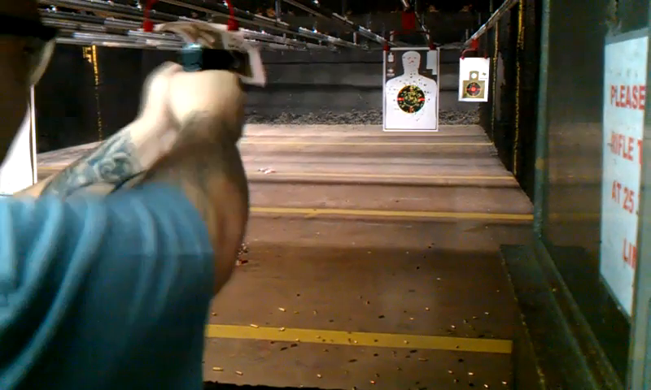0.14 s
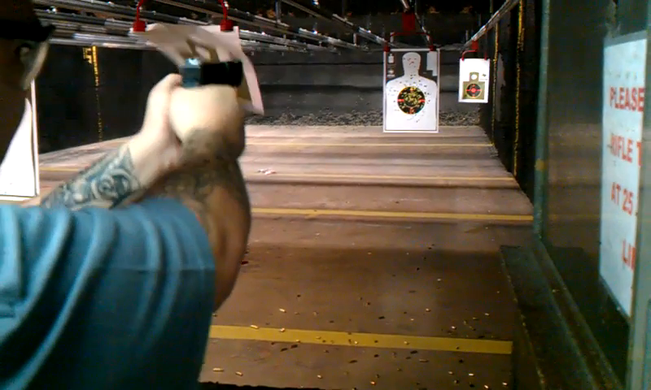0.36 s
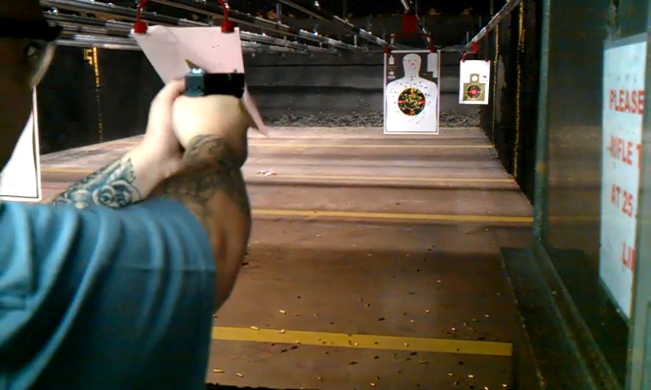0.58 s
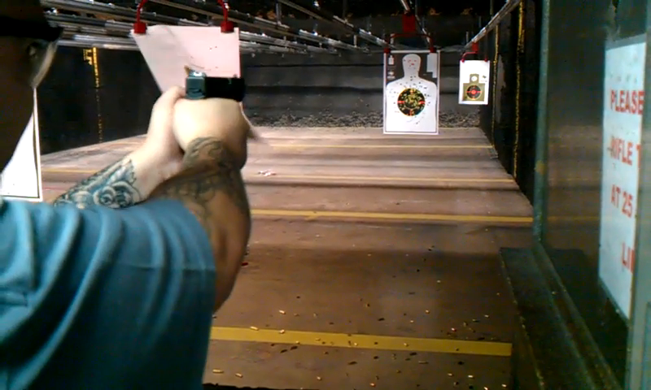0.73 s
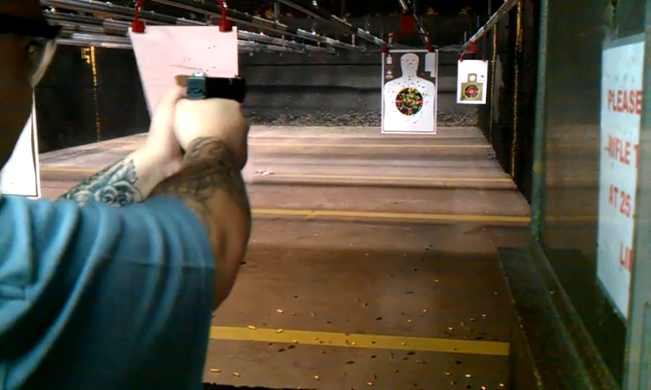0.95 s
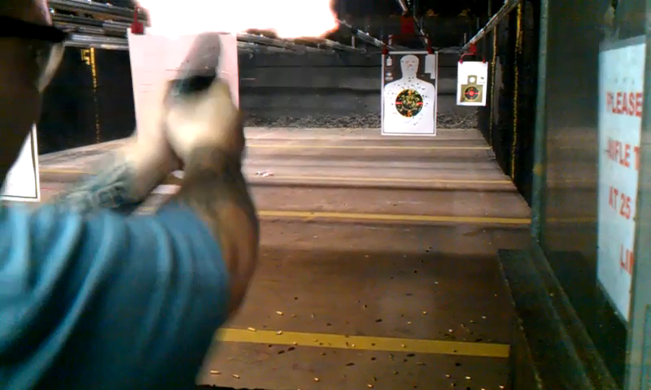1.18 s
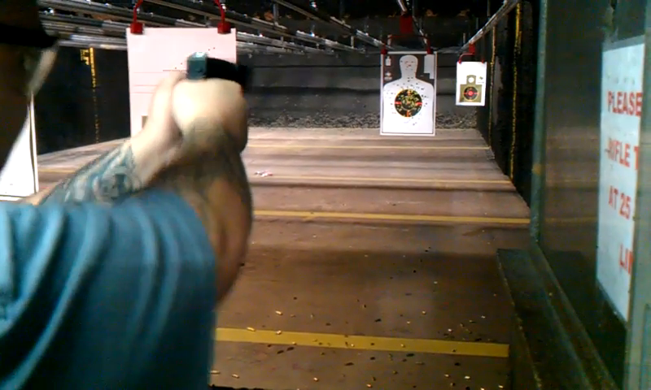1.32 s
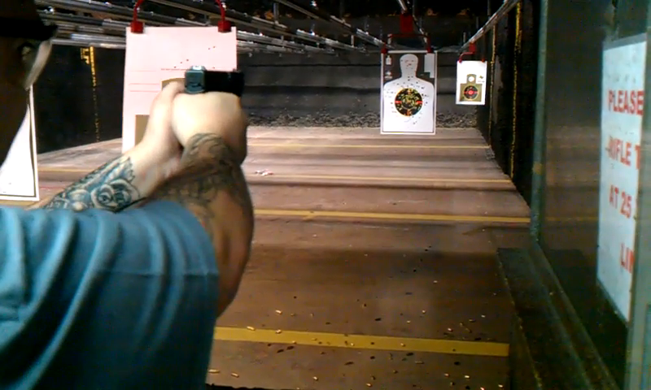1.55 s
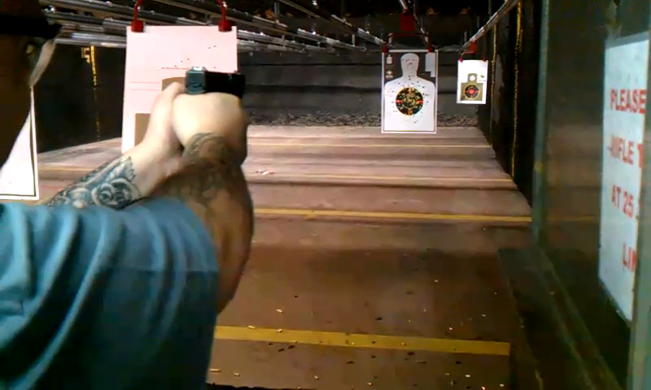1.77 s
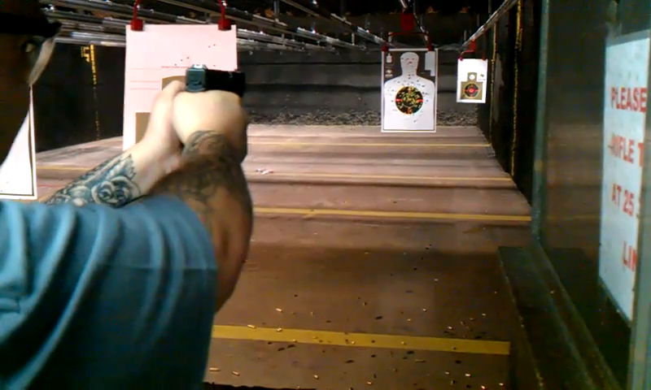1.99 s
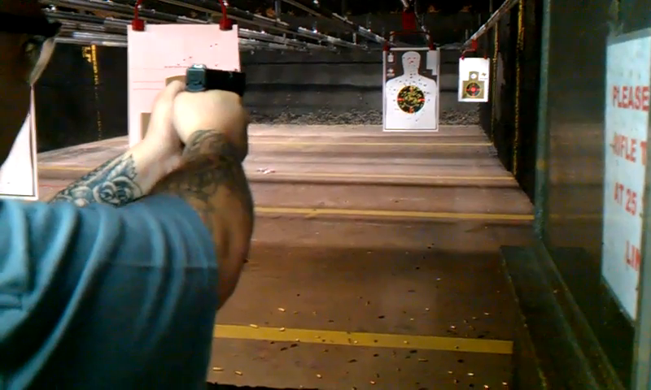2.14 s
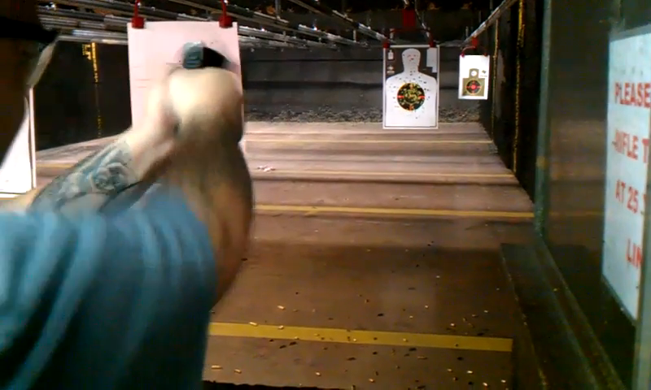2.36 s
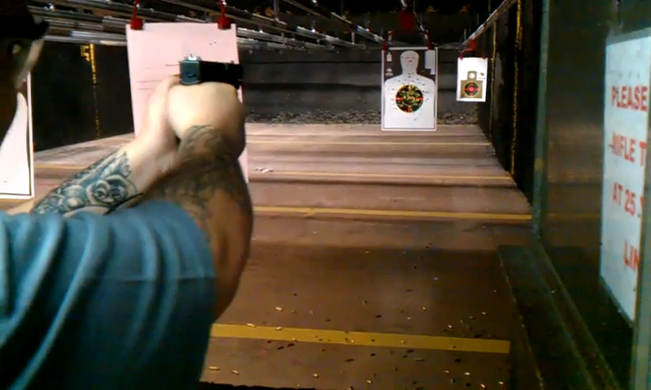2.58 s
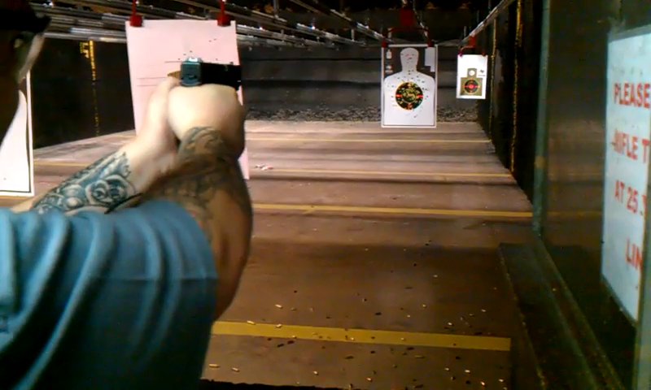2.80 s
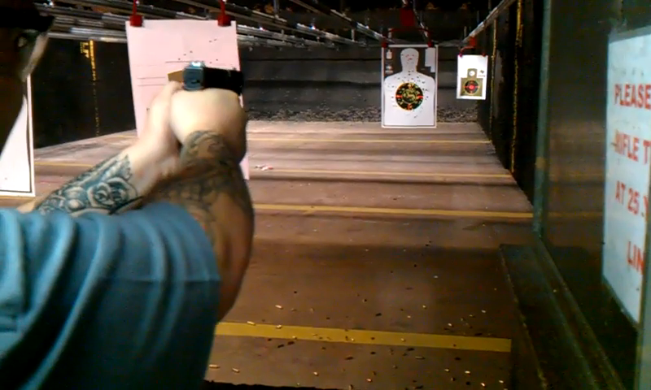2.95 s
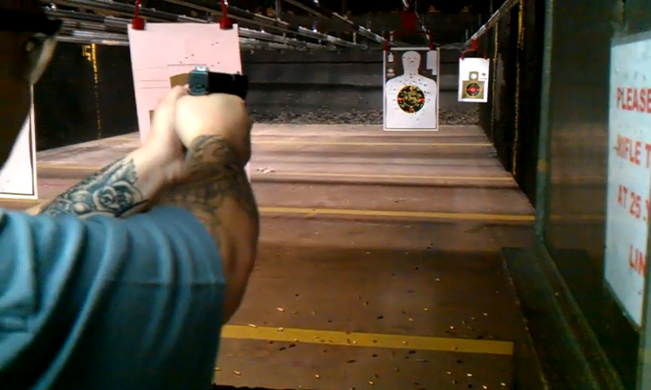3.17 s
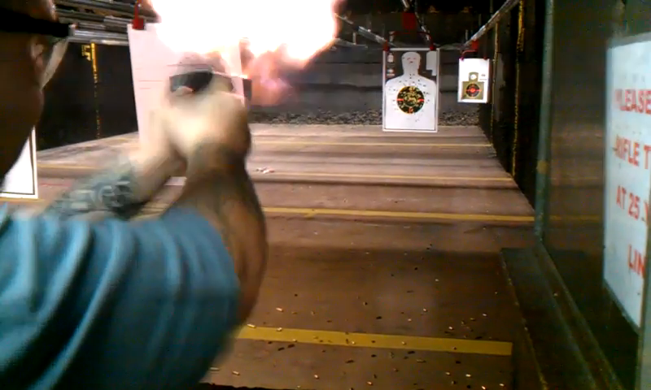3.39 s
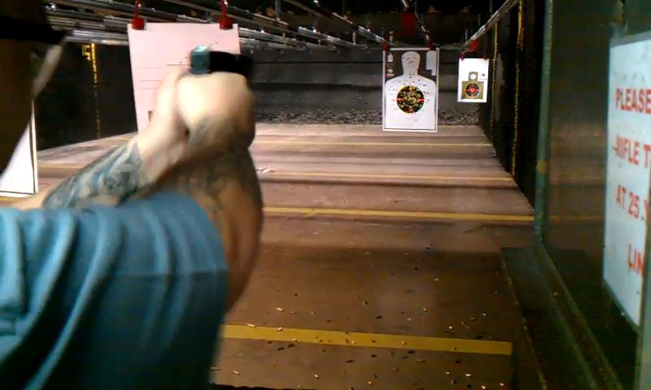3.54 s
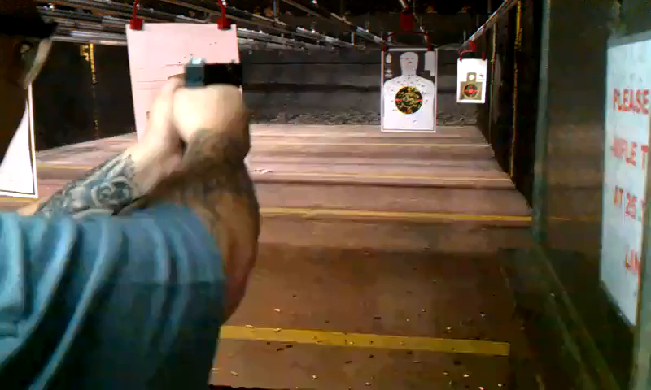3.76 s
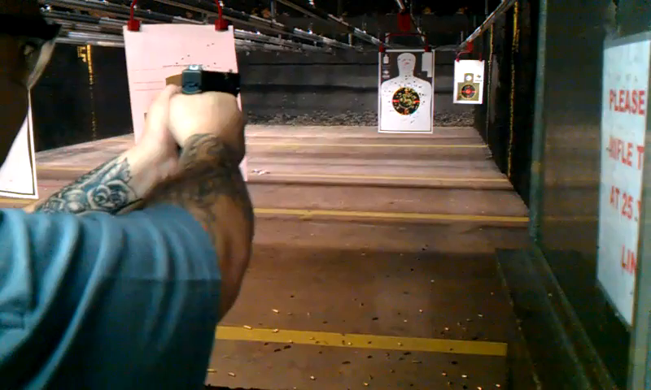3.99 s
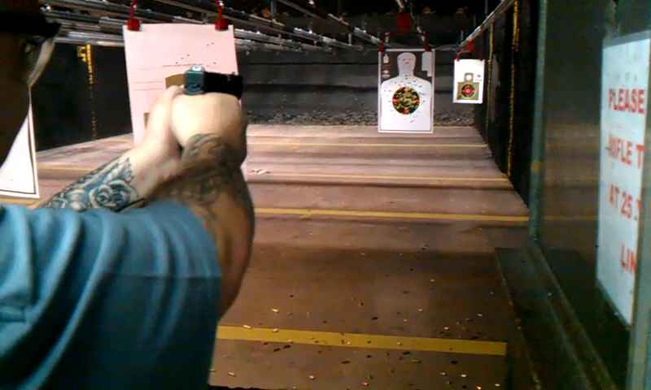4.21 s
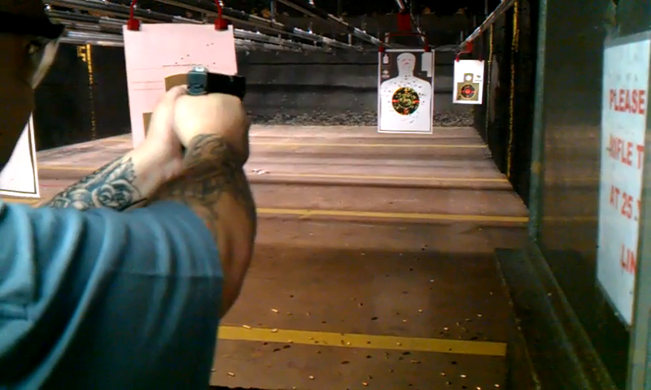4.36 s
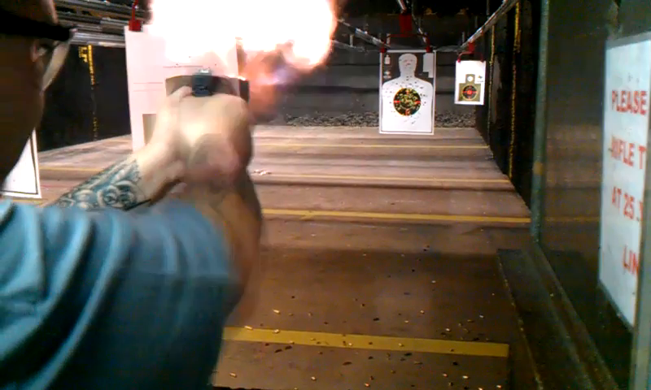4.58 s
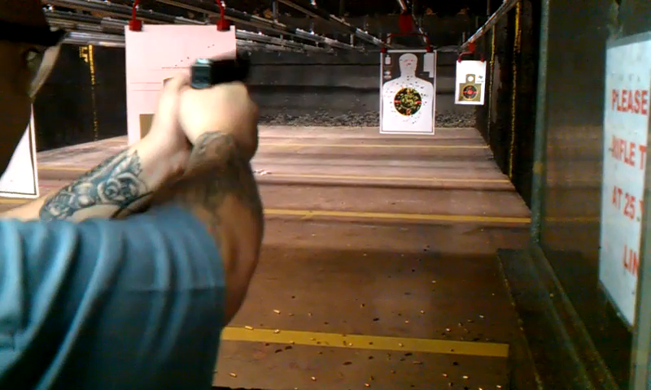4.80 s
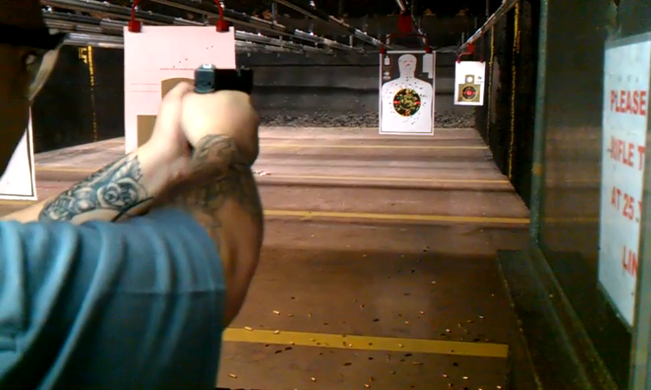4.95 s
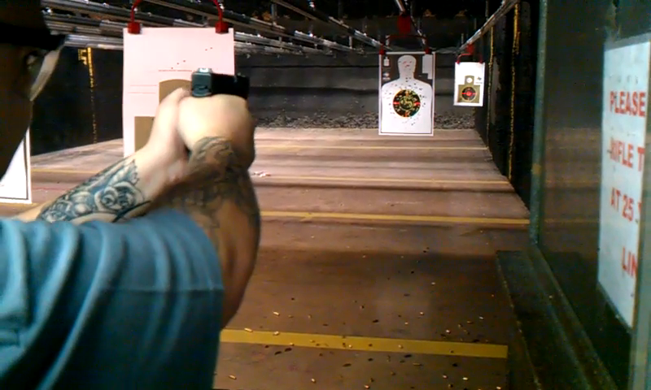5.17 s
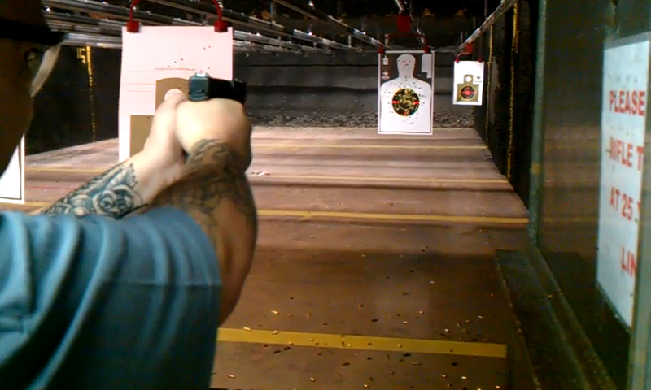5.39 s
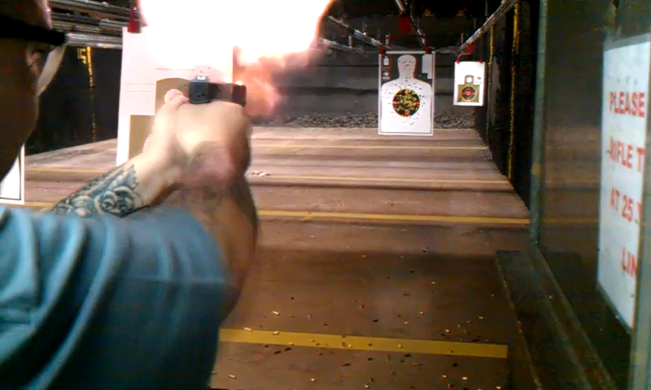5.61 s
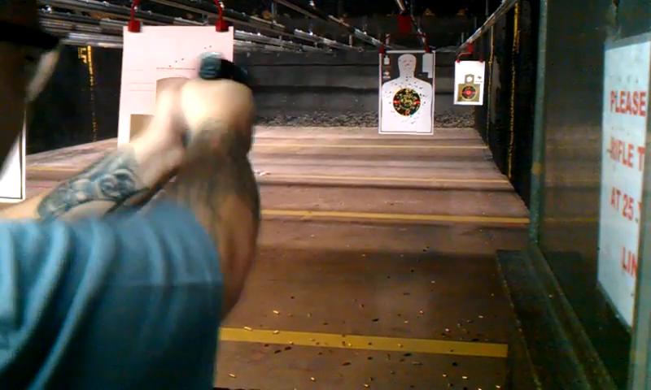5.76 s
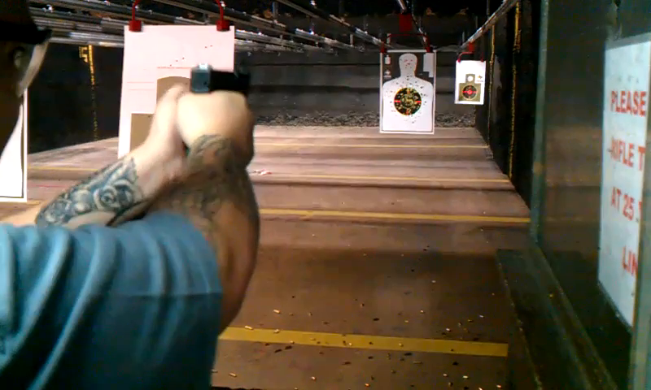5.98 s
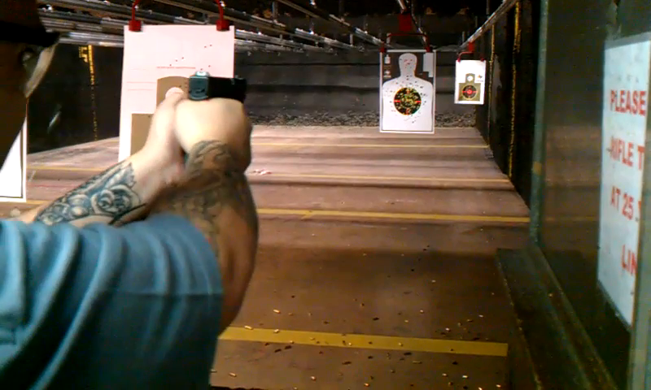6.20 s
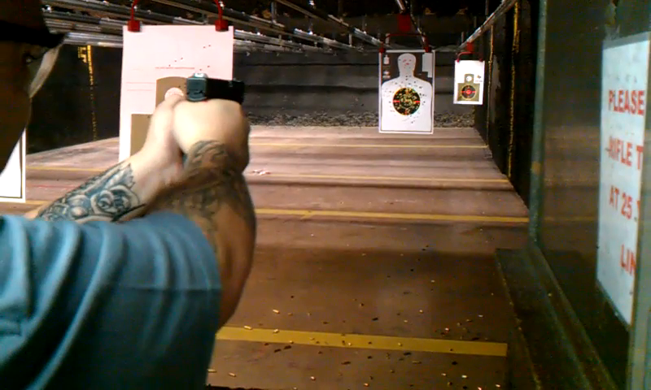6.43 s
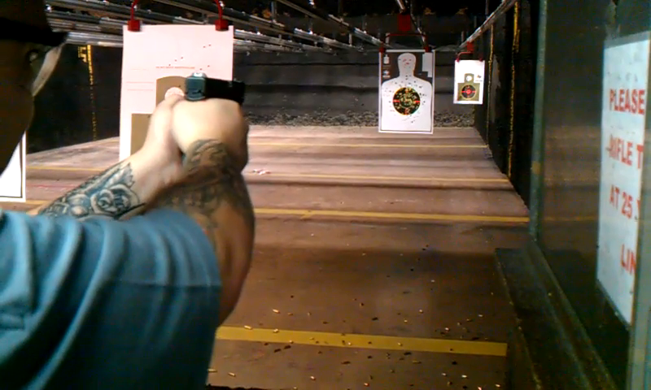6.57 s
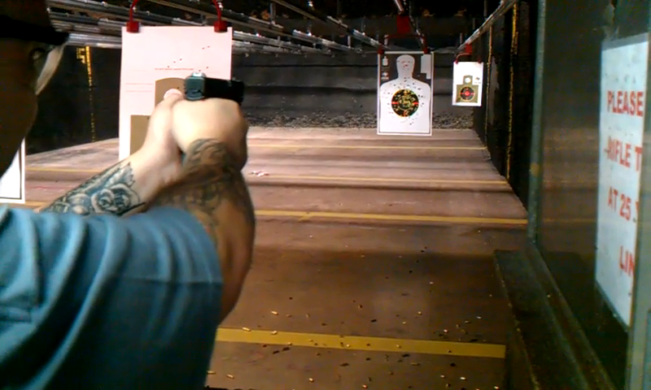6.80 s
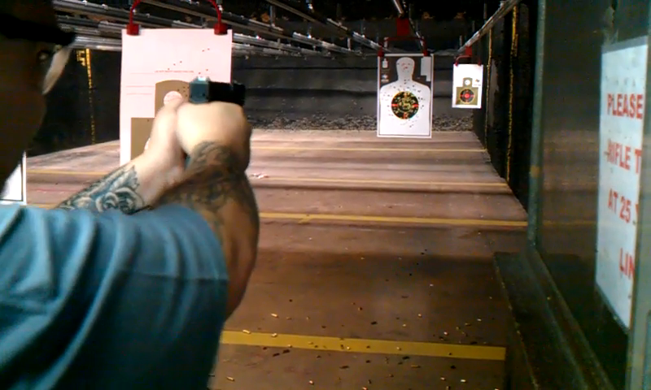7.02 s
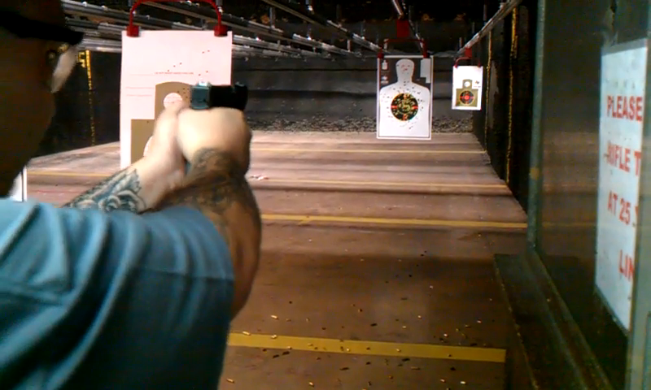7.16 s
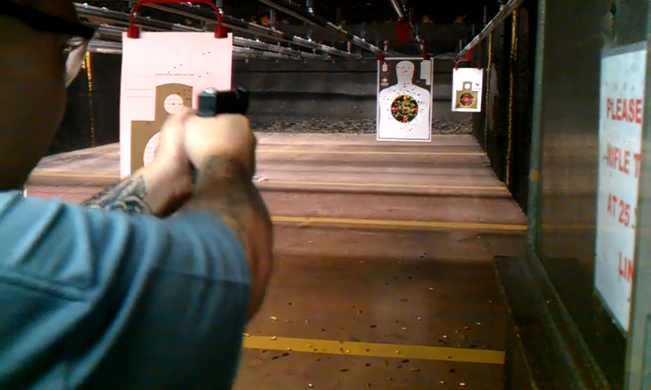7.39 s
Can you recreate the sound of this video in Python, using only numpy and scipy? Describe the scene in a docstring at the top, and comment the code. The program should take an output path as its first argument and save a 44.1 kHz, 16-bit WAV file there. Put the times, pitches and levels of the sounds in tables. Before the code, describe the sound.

Steady string of distorted handgun blasts with dense hall reverberation, followed by tinkling cartridge cases, booth clatters and faint ventilation hum.

```python
"""A bright clatter over rushing air and a motor's hum, and almost at once the first of six pistol shots, about one a second.
Each shot is a crack of noise, a slow pressure swing and a roar of decaying noise bands: the concrete hall of a range.
The roar overloads the input and gain control holds its level. Between shots spent brass cases bounce and ring as
decaying sines, rising chirps and ticks, and things knock and clatter in the booth as shaped, decaying noise."""
import sys
import numpy as np
from scipy import signal
from scipy.fft import rfft, irfft
from scipy.io import wavfile

SR = 44100
rng = np.random.default_rng(int(sys.argv[2]) if len(sys.argv) > 2 else 0)


def inscribe(sig):
    """Save sig as 16-bit PCM at rate SR to the path in sys.argv[1].

    A 1-D sig is mono; a 2-D sig holds one channel per row.
    Samples are clipped to [-1, 1] before scaling.
    """
    pcm = np.round(np.clip(np.atleast_2d(sig).T, -1, 1) * 32767)
    wavfile.write(sys.argv[1], SR, pcm.astype(np.int16))


N = 328545

# Ventilation air, spectrum: frequency_hz, density_db
AIR_SPECTRUM = [(12, -8), (35, -2.5), (55, -10), (120, 0), (200, -2), (320, -10), (680, -11), (1200, -15),
                (2000, -12.5), (3200, -18.5), (4300, -17), (6200, -22), (8000, -20), (9600, -34),
                (15000, -41)]
AIR_LEVEL_DB = -38.5
# Motor hum, partials: multiple_of_turning_rate, level_db (rms)
HUM_PARTIALS = [(1, -43), (2, -52.5), (4, -55.5), (4.23, -56.5), (5, -58.5), (7, -56), (8, -51.5), (9, -57),
                (10, -55.5), (11, -57.5), (17, -60.5), (20, -54.5), (22, -53.5), (24, -56), (29, -55.5),
                (51, -53.5)]
MOTOR_HZ = 82.8   # mean turning rate

# Bright scatter of a hard contact, spectrum: frequency_hz, density_db
CONTACT_SPECTRUM = [(200, -19), (1200, -0.5), (4000, 2.5), (8200, 4), (9800, -2.5), (16000, -4)]
# Dull knocks in the booth: start_s, level_db, centre_hz, width_octaves, thud_db (relative to level_db)
KNOCKS = [(3.437, -28, 3000, 1.6, -17), (5.5472, -23.5, 2630, 0.18, -17), (5.552, -21.5, 2400, 0.14, -19),
          (6.5305, -12.5, 1930, 0.35, -10), (6.851, -33.5, 490, 0.32, -4), (6.957, -17.5, 1820, 0.41, -2.5)]
KNOCK_T60_S, KNOCK_HISS_DB, THUD_HZ, THUD_OCTAVES = 0.2, -37, 580, 0.74
# Bright clatters of metal: start_s, level_db, centre_hz, width_octaves, hiss_db, t60_s, panel_db
# (hiss_db and panel_db are relative to level_db)
CLATTERS = [(-0.03, -20.5, 2130, 0.97, -2.5, 1, -45), (2.0187, -11, 2720, 0.47, -12, 0.56, -7.5),
            (2.1867, -17, 3300, 0.61, -3.5, 0.36, -9.5), (3.0972, -29, 4560, 0.13, -9, 0.39, -40),
            (6.976, -15, 9950, 0.11, 3, .22, -23)]
# Modes of the sheet-metal booth panel: frequency_hz, relative_level_db, t60_s
PANEL_MODES = [(1772, -1.5, 0.62), (2350, -0.5, 0.39), (2710, -3, 0.41), (3090, -1, 0.5), (7970, -6, 0.55),
               (10550, -5.5, 0.51), (12470, -22, 0.42)]

# Spent cases striking the floor and the booth wall: first_touch_s, second_touch_s, third_touch_s,
# ring_pitch_hz, air_pitch_hz, ring_db, clack_db, tick_db, loss_per_bounce_db (of ring and tick)
CASES = [(0.383, 0.657, 0.958, 8750, 4250, -26, -32, -29, 16.5),
         (1.686, 1.8595, 1.9515, 9020, 4220, -24, -19, -25, 1.5),
         (3.095, 3.109, 3.13, 8750, 4520, -35.5, -23, -11.5, 14),
         (3.42, 3.822, 3.92, 8750, 4250, -22, -31, -24, 8.5),
         (5.078, 5.274, 5.378, 8930, 4630, -39, -24.5, -25.5, -0.3),
         (6.1398, 6.327, 6.383, 8884, 4500, -33, -21, -15.5, 20),
         (6.444, 6.46, 6.531, 8900, 4250, -42, -48, -33, 1),
         (7.066, 7.139, 7.245, 9200, 4170, -36, -24, -34, 5)]
# Loss of the clack on the first, second and third touch: loss_db
CLACK_LOSSES = (-0.5, 6.5, 15)
CASE_T60_S = 0.45
# The air in a case sounds flat while its mouth is near the surface it strikes and rises as it lifts off.
CLACK_FLAT_HZ, CLACK_RISE_S = 600, 0.0029

# The hall's roar, spectrum: frequency_hz, density_db
ROAR_SPECTRUM = [(25, -1), (70, -11.5), (115, 1), (200, -3), (320, 4), (520, 0), (850, -0.5), (1400, -3.5),
                 (2200, 0.5), (3100, -6.5), (4500, -7), (6300, -8.5), (8300, -6.5), (10000, -36)]
# The hall's reverberation time: frequency_hz, t60_s
HALL_T60 = [(50, 0.64), (110, 0.83), (300, 0.48), (800, 0.76), (2000, 0.67), (5000, 0.61), (12000, 0.45)]
# Standing waves of the lane: frequency_hz, width_hz, lift_db
LANE_MODES = [(114, 14, 7), (146, 4.8, 4.5), (238, 28, 7.5), (393, 14, 5), (522, 12, -3.5), (750, 30, 8.5),
              (872, 14, 5), (920, 340, 4.5), (1470, 14, 6.5)]
# Pistol shots: start_s, level_db (common gain of crack, swing and roar)
SHOTS = [(0.0509, 20.5), (1.1913, 21.5), (2.3231, 20.5), (3.4492, 20.5), (4.6161, 20.5), (5.6895, 21)]

# Recording: limit of the input (amplitude), level the gain control holds, top of the passband
OVERLOAD, HOLD_DB, CUTOFF_HZ = 0.29, -17.5, 15900


def from_db(db):
    """Level: decibels to an amplitude ratio."""
    return 10 ** (np.asarray(db) / 20)


def rms_one(x):
    """Normalisation: scale to unit rms."""
    return x / np.sqrt(np.mean(x ** 2) + 1e-20)


def at_hz(points, hz):
    """Interpolation: read a table's second column along a log-frequency axis."""
    points = np.array(points)
    return np.interp(np.log(hz), np.log(points[:, 0]), points[:, 1])


def bins(size):
    """Fourier analysis: frequencies of a spectrum, kept above zero for the logarithm."""
    return np.maximum(np.fft.rfftfreq(size, 1 / SR), 1)


def noise(gain, size):
    """Spectral shaping: white noise with the given gain at each frequency, brought to unit rms."""
    white = rfft(rng.standard_normal(size))
    return rms_one(irfft(white * gain, size))


def contact_hiss():
    """Impact of hard bodies: one second of bright noise."""
    return noise(from_db(at_hz(CONTACT_SPECTRUM, bins(SR))), SR)


def hump(hz, centre_hz, octaves):
    """Damped resonance: a broad peak with gentle skirts."""
    return 1 / (1 + (np.log2(hz / centre_hz) / octaves) ** 2 / 2)


def dying(t, t60):
    """Damping: exponential decay, 60 dB in t60 seconds."""
    return np.exp(-np.log(1000) * t / t60)


def add(out, s, sound):
    """Superposition: mix a sound in from time s, trimmed to the scene."""
    start = round(s * SR)
    sound = sound[max(-start, 0):N - start]
    first = max(start, 0)
    out[first:first + len(sound)] += sound


def ventilation(speed_waver=0.000855, level_waver=0.15, waver_hz=4):
    """Turbulence and rotation: broadband air noise, and partials of a motor whose speed and level waver slightly."""
    hz = bins(N)
    slow = 1 / (1 + (hz / waver_hz) ** 2)
    turns = np.cumsum(MOTOR_HZ * (1 + speed_waver * noise(slow, N))) / SR
    hum = 0
    for multiple, db in HUM_PARTIALS:
        phase = multiple * turns + rng.random()
        hum += from_db(db) * np.sqrt(2) * np.sin(2 * np.pi * phase)
    air = from_db(AIR_LEVEL_DB) * noise(from_db(at_hz(AIR_SPECTRUM, hz)), N)
    return air + hum * (1 + level_waver * noise(slow, N))


def booth_knocks(snap_db=0, snap_t60=0.017, tail_db=-2):
    """Modal overlap: a knock is a short snap, a hollow ring of many close modes and a low thud."""
    out, t, hz = np.zeros(N), np.arange(SR) / SR, bins(SR)
    for s, db, centre_hz, octaves, thud_db in KNOCKS:
        body = noise(hump(hz, centre_hz, octaves), SR) + from_db(KNOCK_HISS_DB) * contact_hiss()
        thud = from_db(thud_db) * noise(hump(hz, THUD_HZ, THUD_OCTAVES), SR)
        fade = dying(t, KNOCK_T60_S)
        snap_and_tail = from_db(snap_db) * dying(t, snap_t60) + from_db(tail_db) * fade
        add(out, s, from_db(db) * (body * snap_and_tail + thud * fade))
    return out


def build_up(t, rise_s, contact):
    """Onset of resonance: the contact sounds at once, the ringing builds up."""
    return 1 - (1 - contact) * np.exp(-t / rise_s)


def panel_ring(t, pair_hz=14, pair=0.67):
    """Beating: each panel mode sounds with a weaker twin at a randomly offset pitch (spread pair_hz)."""
    ring = 0
    for mode_hz, db, t60 in PANEL_MODES:
        twin_hz = mode_hz + pair_hz * rng.normal()
        tones = np.sin(2 * np.pi * mode_hz * t) + pair * np.sin(2 * np.pi * twin_hz * t)
        ring += from_db(db) * tones * dying(t, t60)
    return ring


def metal_clatter(rise_share=0.014, contact=0.29):
    """Modal excitation: each clatter shakes many close modes of the booth and a few distinct ones of the panel."""
    out, t, hz = np.zeros(N), np.arange(SR) / SR, bins(SR)
    for s, db, centre_hz, octaves, hiss_db, t60, panel_db in CLATTERS:
        body = noise(hump(hz, centre_hz, octaves), SR) + from_db(hiss_db) * contact_hiss()
        ringing = body * dying(t, t60) + from_db(panel_db) * panel_ring(t)
        add(out, s, from_db(db) * build_up(t, rise_share * t60, contact) * ringing)
    return out


def bounces():
    """Energy loss at impact: (start_s, ring_hz, air_hz, ring_db, clack_db, tick_db) of every touch."""
    touches = []
    for *starts, ring_hz, air_hz, ring_db, clack_db, tick_db, loss_db in CASES:
        for k, s in enumerate(starts):
            lost_db = k * loss_db
            touches.append((s, ring_hz, air_hz, ring_db - lost_db, clack_db - CLACK_LOSSES[k], tick_db - lost_db))
    return touches


def brass_cases(clack_octaves=0.032, clack_t60=0.029, tick_t60=0.0059, echo_db=-16, echo_t60=0.24,
                ring_width_hz=30, scatter_db=-2, tumble=1.0, swell_s=0.0043):
    """Shell and cavity resonance: a tick, a hollow rising clack, and the mouth's ring throbbing as the case tumbles."""
    out, t, hz = np.zeros(N), np.arange(SR) / SR, bins(SR)
    echo = from_db(echo_db) * dying(t, echo_t60)
    for s, ring_hz, air_hz, ring_db, clack_db, tick_db in bounces():
        throb = 1 + tumble * np.cos(2 * np.pi * rng.uniform(14.7, 33) * t)
        scattered = from_db(scatter_db) * noise(1 / (1 + ((hz - ring_hz) / ring_width_hz) ** 2), SR)
        ring = np.sin(2 * np.pi * ring_hz * t) * throb + scattered
        ring *= dying(t, CASE_T60_S) * (1 - np.exp(-t / swell_s))
        pitch_hz = air_hz - CLACK_FLAT_HZ * np.exp(-t / CLACK_RISE_S)
        chirp = np.sin(2 * np.pi * np.cumsum(pitch_hz) / SR)
        clack = np.sqrt(2) * chirp * dying(t, clack_t60) + noise(hump(hz, air_hz, clack_octaves), SR) * echo
        tick = contact_hiss() * (dying(t, tick_t60) + echo)
        add(out, s, from_db(ring_db) * ring + from_db(clack_db) * clack + from_db(tick_db) * tick)
    return out


def hall_roar(t, build_cycles=6, settle_s=0.51):
    """Reverberation: dense reflections as octave bands of noise, each dying at its own rate."""
    hz = bins(len(t))
    lift_db = sum(db / (1 + (2 * (hz - centre) / width) ** 2) for centre, width, db in LANE_MODES)
    diffuse = noise(from_db(at_hz(ROAR_SPECTRUM, hz)), len(t))
    standing = irfft(rfft(diffuse) * (from_db(lift_db) - 1), len(t))
    # Standing waves emerge as the rest dies.
    spectrum = rfft(diffuse + standing * np.minimum(t / settle_s, 1))
    centres = np.geomspace(20, 20480, 11)[:, None]
    shares = np.maximum(1 - abs(np.log2(hz / centres)), 0)   # overlapping octave bands
    swell = 1 - np.exp(-t * centres / build_cycles)   # the bass takes longest to build up
    bands = irfft(spectrum * shares, len(t))
    return np.sum(bands * swell * dying(t, at_hz(HALL_T60, centres)), axis=0)


def late_swell(t, swell_db=1.5, arrival_s=0.495, spread_s=0.046, early_db=-1.5):
    """Delayed reflection: sound that has run down the long lane and back lifts the roar in a broad second wave."""
    wave = np.exp(-.5 * ((t - arrival_s) / spread_s) ** 2)
    return from_db(early_db + swell_db * wave)


def pistol(crack_db=1, crack_t60=0.1, swing_db=-4, swing_hz=9, swing_t60=0.32, alike=0.3):
    """Blast wave: a bright crack off the booth walls, the slow pressure swing of the muzzle gas, then the hall."""
    out, t = np.zeros(N), np.arange(SR) / SR
    # Fired from one spot, the shots have part of their echoes in common.
    same_paths, share = hall_roar(t), np.clip(alike, 0, 1)
    for s, db in SHOTS:
        crack = from_db(crack_db) * contact_hiss() * dying(t, crack_t60)
        swing = -from_db(swing_db) * np.cos(2 * np.pi * swing_hz * t) * dying(t, swing_t60)
        roar = np.sqrt(share) * same_paths + np.sqrt(1 - share) * hall_roar(t)
        add(out, s, from_db(db) * (crack + swing + roar * late_swell(t)))
    return out


def scene():
    """Superposition: all sources sum at one microphone, alike in both channels."""
    mix = ventilation() + booth_knocks() + metal_clatter() + brass_cases() + pistol()
    return np.tile(mix, (2, 1))


def gain_control(x, sense_s=0.0021, release_db_per_s=110, attack_s=0.00028):
    """Compression: loud sound is turned down to a fixed level within milliseconds and let go steadily."""
    sense, attack = np.exp(-1 / (sense_s * SR)), np.exp(-1 / (attack_s * SR))
    power = signal.lfilter([1 - sense], [1, -sense], x ** 2)
    level_db = 10 * np.log10(power + 1e-12)
    # A running maximum against a rising ramp makes the cut fall at a constant rate.
    ramp = release_db_per_s * np.arange(N) / SR
    cut_db = np.maximum.accumulate(np.maximum(level_db - HOLD_DB, 0) + ramp) - ramp
    return x * from_db(-signal.lfilter([1 - attack], [1, -attack], cut_db))


def record(dry, knee=10.0, presence_hz=7800, presence_q=7.1, presence=0.4, low_cut_hz=18):
    """Saturation and filtering: the input overloads; then a presence peak, low cut, gain control and top cut."""
    fine = signal.resample_poly(dry[0], 3, 1)   # oversampled to limit aliasing
    flattened = fine / (1 + abs(fine / OVERLOAD) ** knee) ** (1 / knee)
    x = signal.resample_poly(flattened, 1, 3)
    x = x + presence * signal.lfilter(*signal.iirpeak(presence_hz, presence_q, fs=SR), x)
    x = signal.lfilter(*signal.butter(1, low_cut_hz, "high", fs=SR), x)
    x = gain_control(x)
    top_cut = signal.ellip(12, .1, 80, CUTOFF_HZ, fs=SR, output="sos")
    return np.tile(signal.sosfilt(top_cut, x), (2, 1))


dry = scene()
out = record(dry)
inscribe(out)
```